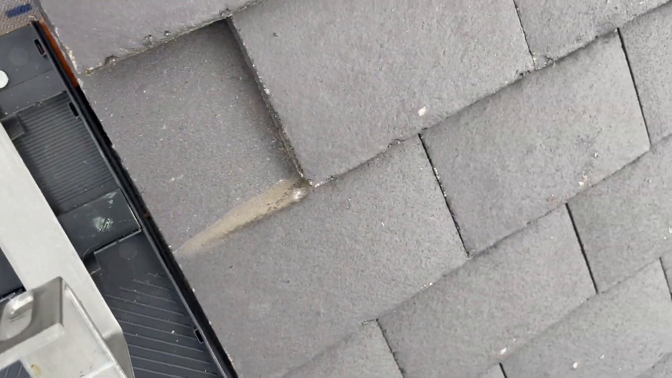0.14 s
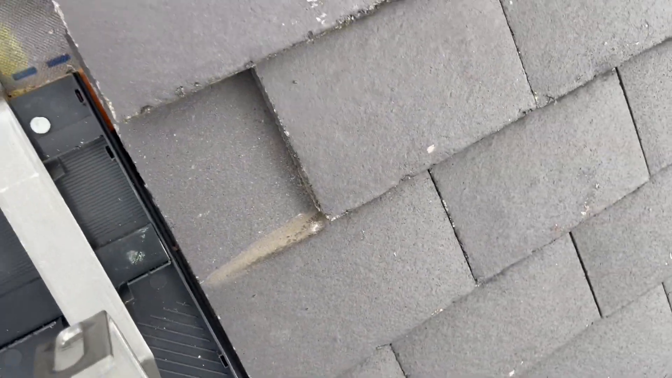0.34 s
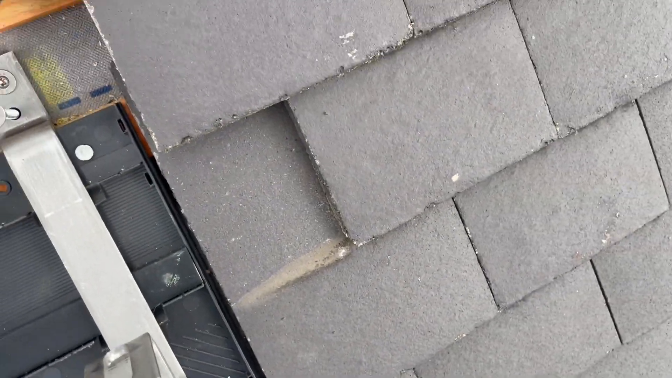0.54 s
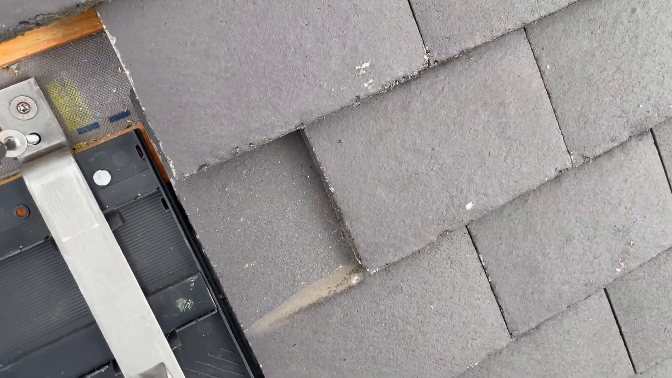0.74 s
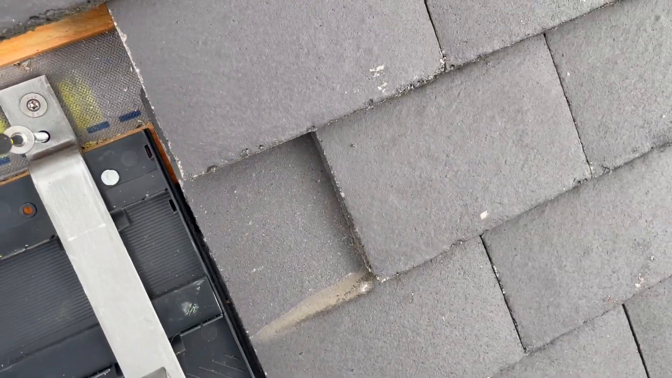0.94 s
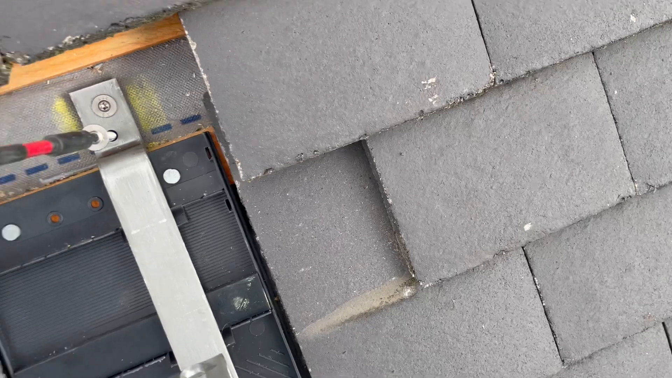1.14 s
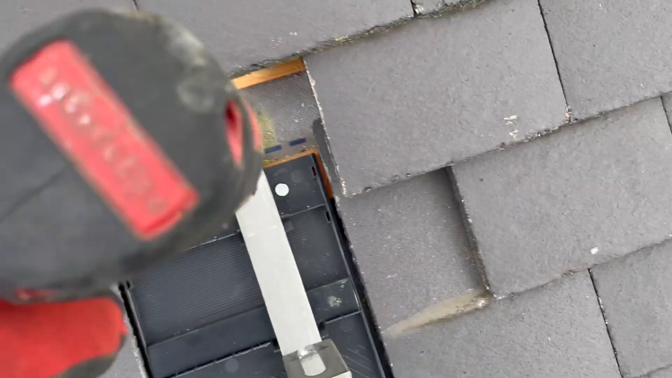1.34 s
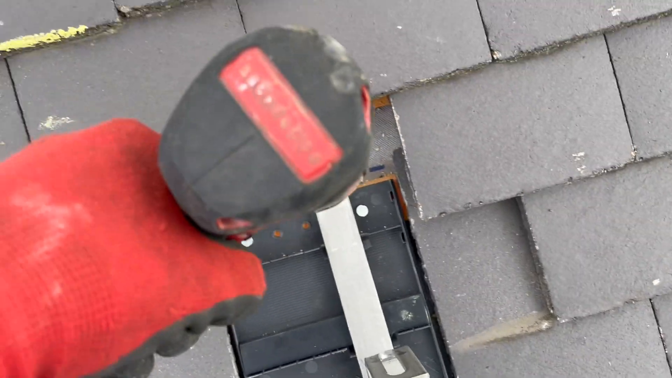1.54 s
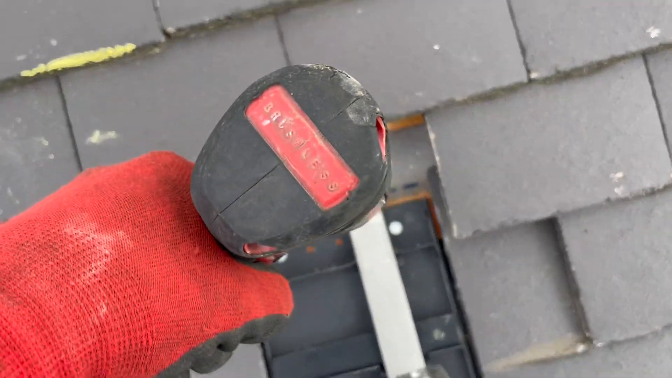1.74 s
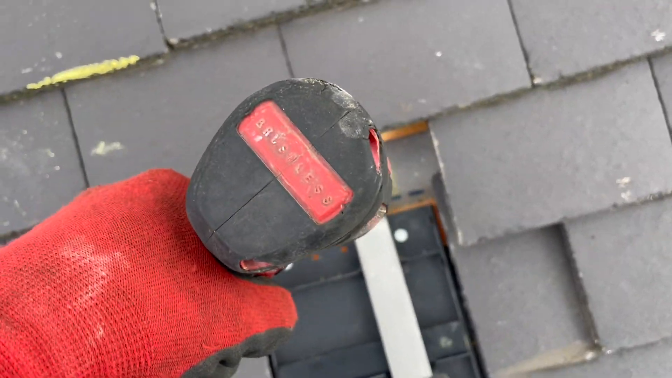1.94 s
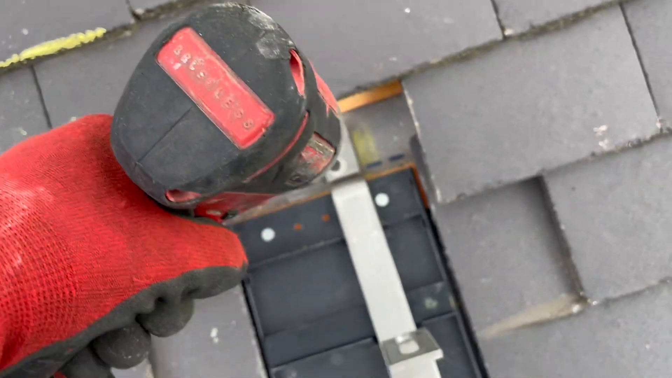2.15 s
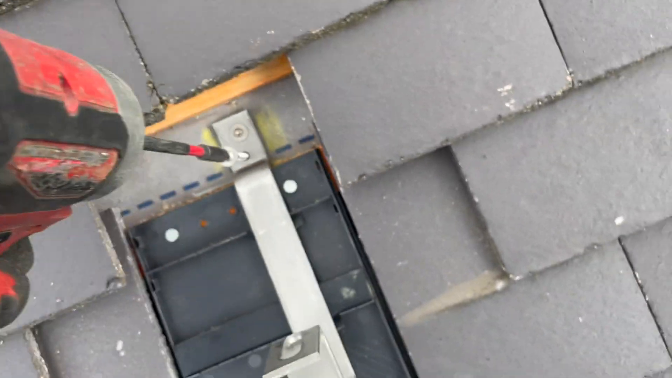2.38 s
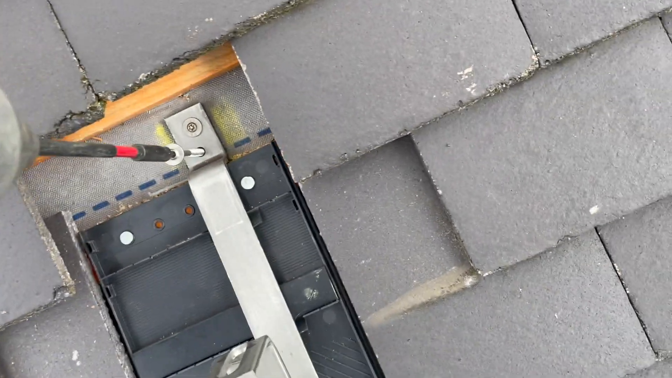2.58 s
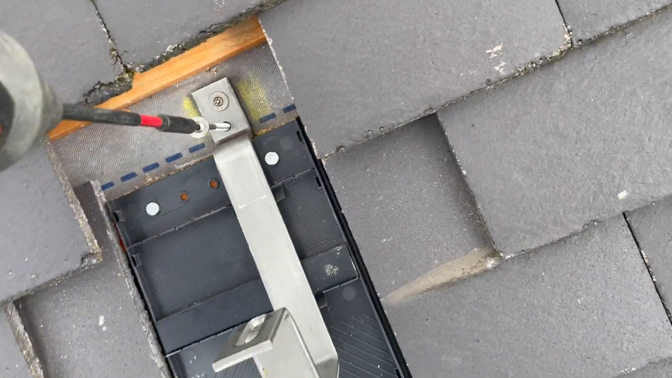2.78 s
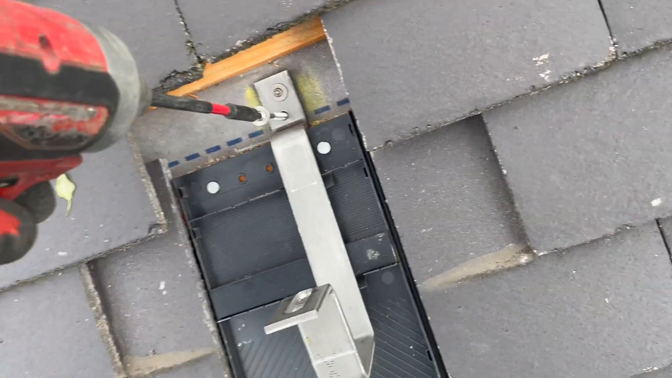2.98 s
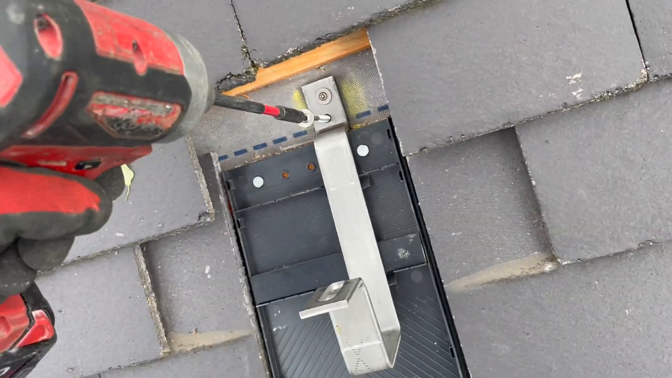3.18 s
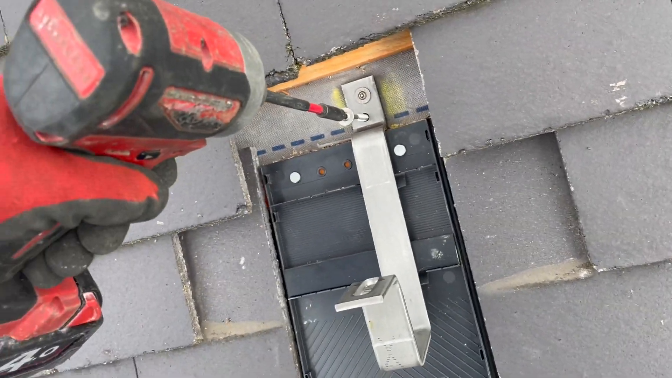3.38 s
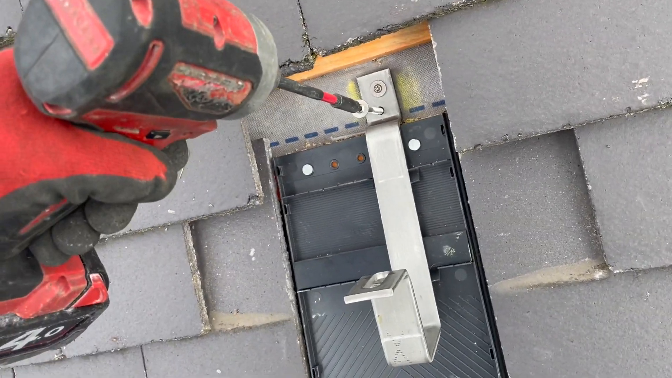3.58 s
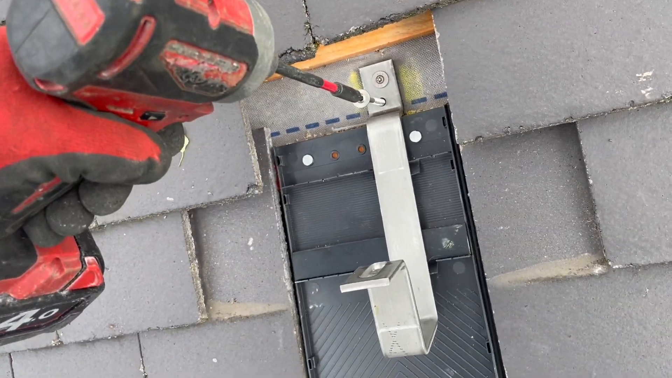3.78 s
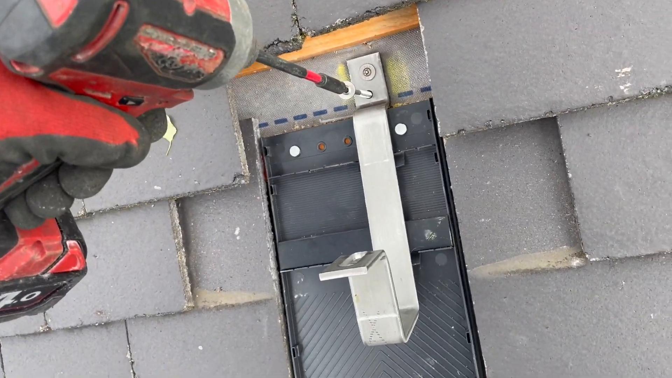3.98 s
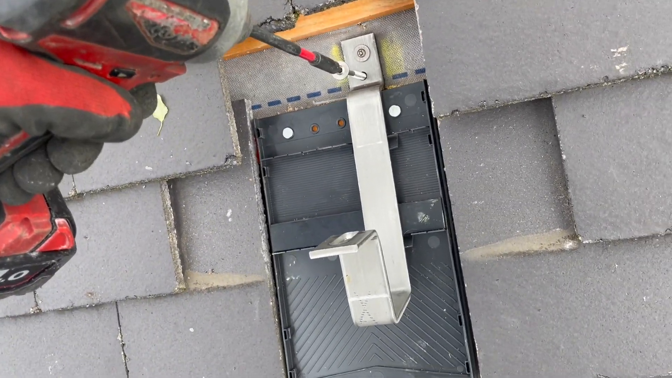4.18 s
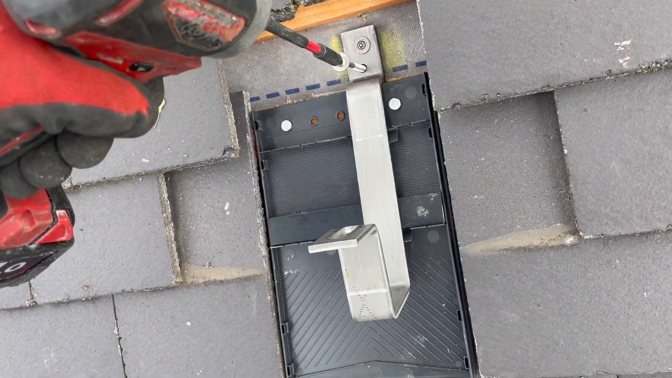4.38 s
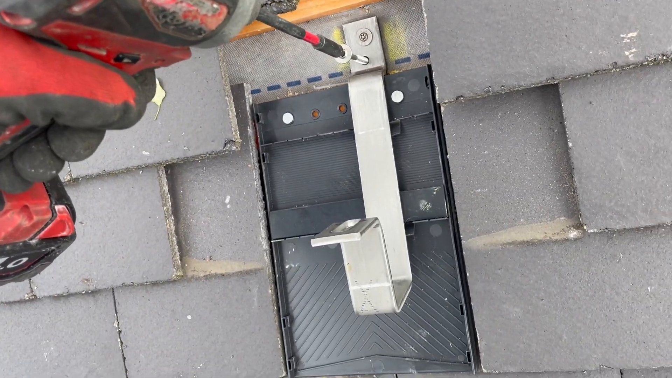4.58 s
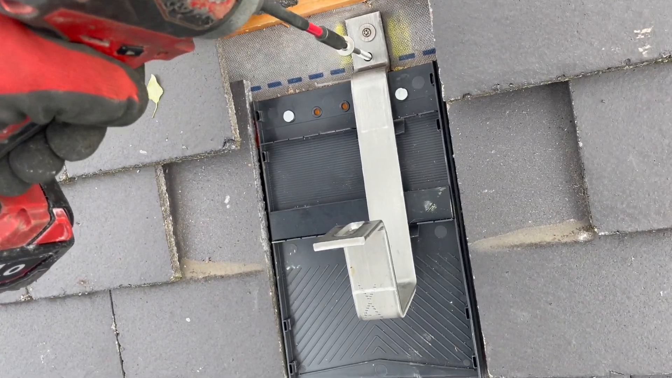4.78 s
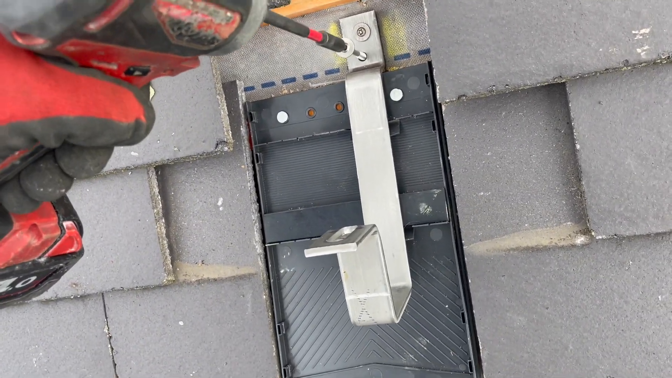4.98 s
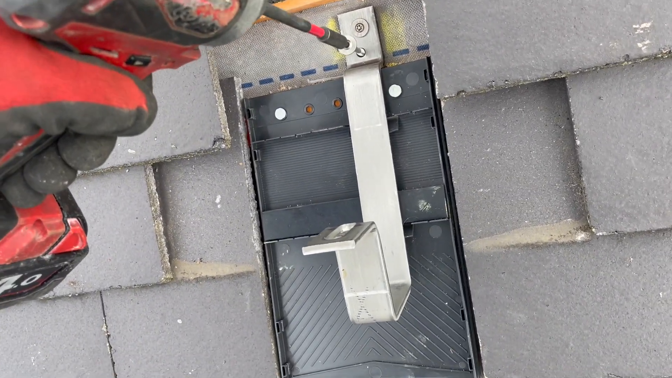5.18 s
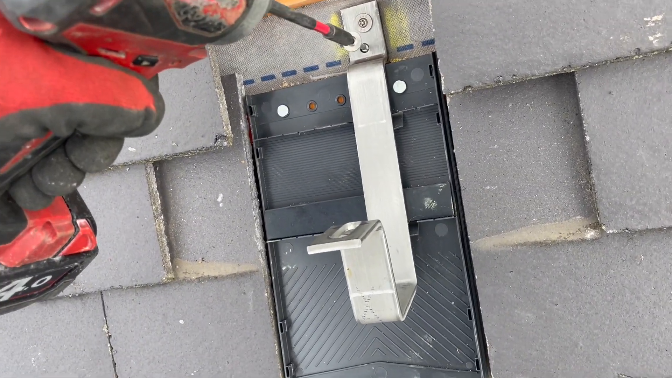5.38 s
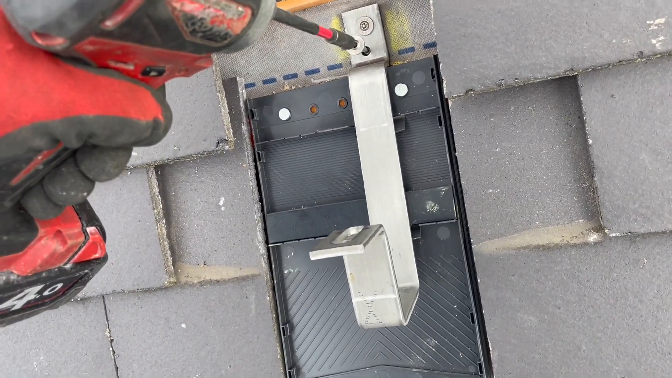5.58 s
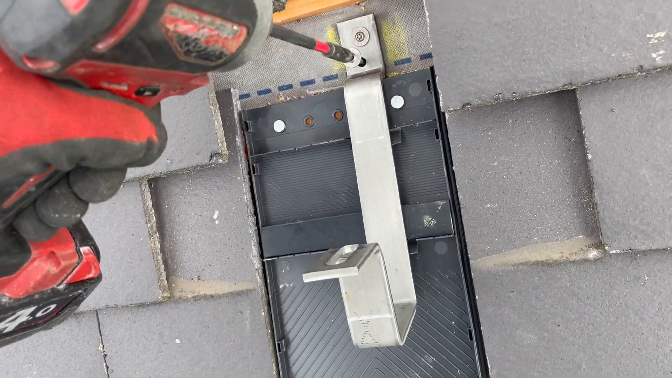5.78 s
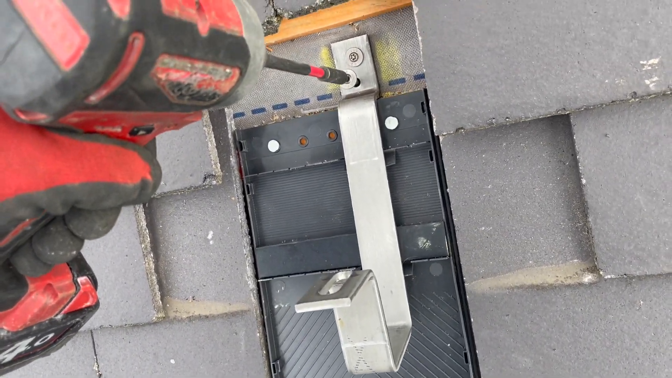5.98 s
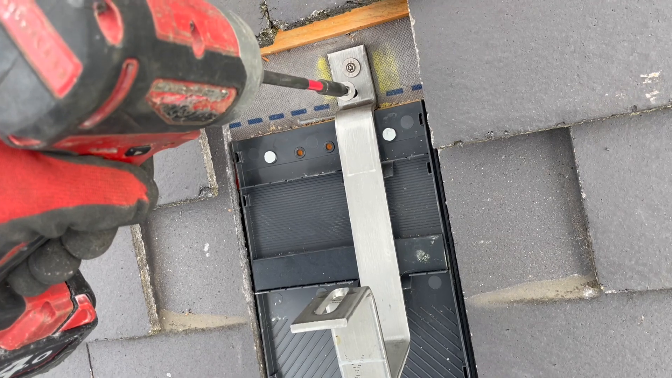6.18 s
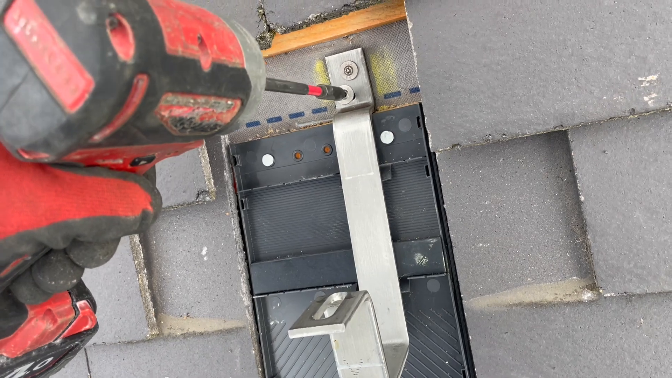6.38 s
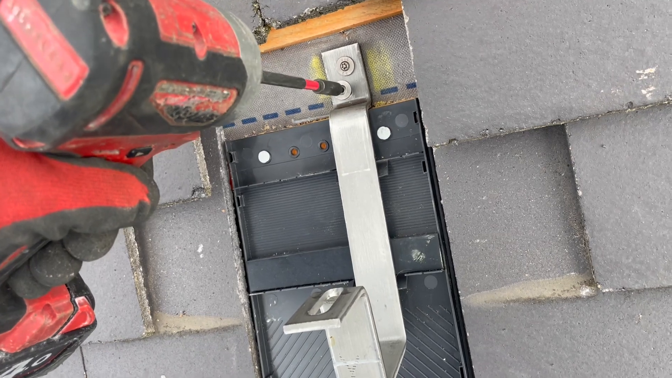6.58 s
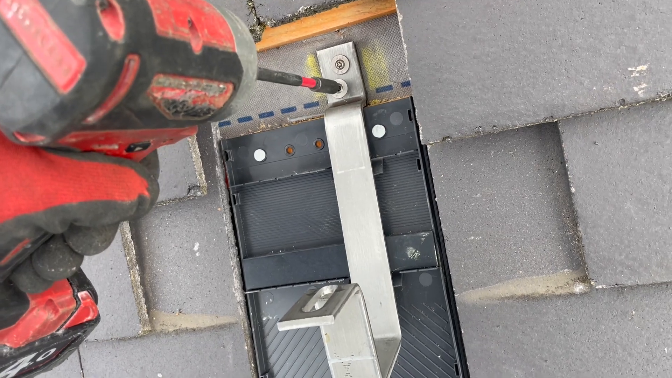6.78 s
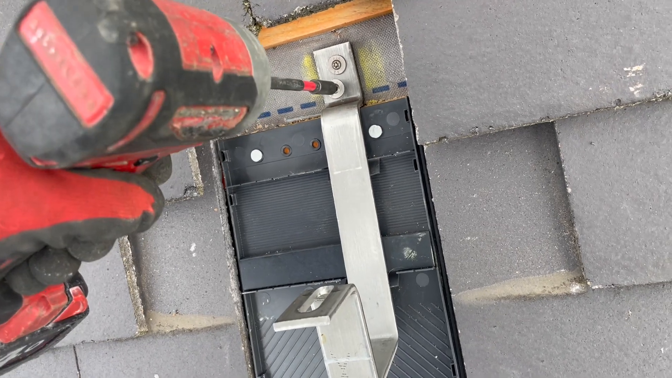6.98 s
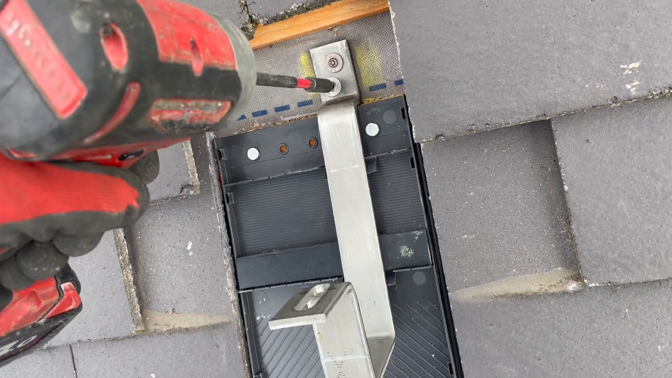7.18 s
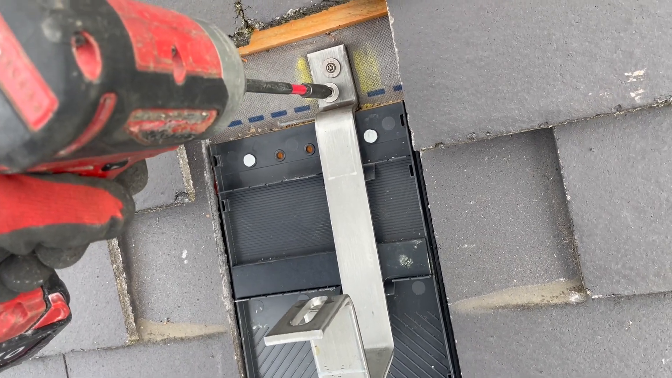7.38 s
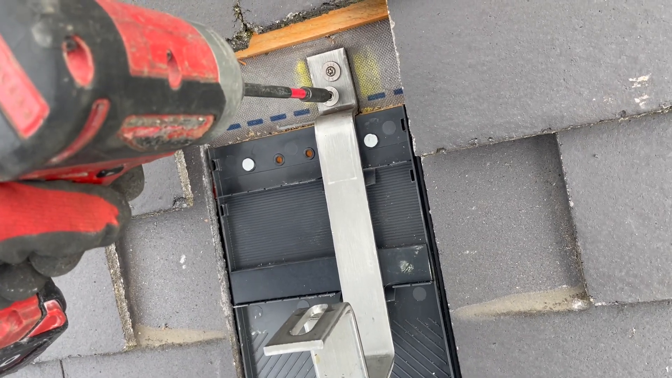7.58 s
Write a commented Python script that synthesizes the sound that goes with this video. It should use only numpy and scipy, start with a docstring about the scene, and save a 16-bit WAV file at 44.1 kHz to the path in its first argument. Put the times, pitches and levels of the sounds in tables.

```python
"""An impact driver sinks a screw through a steel hook into a rafter, close to a two-port microphone on a slate roof.
The tool knocks into place while a small bird whistles far off over a quiet hush. The motor spins up with a whine
of gliding sines and brief squeaks, then the hammer rattles towards sixty blows a second before the gears run down.
Blows are bursts of coloured noise and impulses ringing the casing and timber; knocks ring the hook's modes.
Thumps, a rumble of air and a rubbing grip, all shaped noise, betray the microphone being handled."""
import sys
import numpy as np
from scipy import signal
from scipy.fft import rfft, irfft, next_fast_len
from scipy.io import wavfile
from scipy.ndimage import map_coordinates

SR = 44100
rng = np.random.default_rng(int(sys.argv[2]) if len(sys.argv) > 2 else 0)


def write(x):
    x = np.atleast_2d(x).T
    wavfile.write(sys.argv[1], SR, np.round(np.clip(x, -1, 1) * 32767).astype(np.int16))


N = 336924
TIME = np.arange(N) / SR  # s

# Handling
# the microphone is jostled: [t/s, peak level/dB, colour corner f/Hz]
THUMP_EVENTS = [(.005, -25.5, 118), (0.039, -24, 85), (.51, -35, 198), (0.559, -32, 199),
                (0.849, -30.5, 118), (1.29, -30, 154), (2.175, -26.5, 199), (2.361, -26, 119),
                (2.39, -19, 169), (2.444, -25, 155), (2.597, -28, 178), (3.838, -35, 88), (4.55, -29, 160),
                (4.615, -25.5, 155), (4.868, -18, 340), (6.101, -27, 220), (6.642, -19, 91.3),
                (6.968, -33.5, 252), (7.042, -29.5, 398.3), (7.105, -25.5, 291), (7.125, -26, 200),
                (7.263, -25, 322), (7.3, -30, 397.3), (7.34, -24.5, 354), (7.385, -31, 380),
                (7.495, -31, 379)]
# air moving over the microphone: [t/s, relative level/dB]
AIR_LEVEL = [(0, -33.5), (.06, -30), (.28, -51), (.37, -46.5), (1.3, -41), (1.5, -50), (2.08, -46),
             (2.4, -33.5), (2.7, -51), (3.1, -70.5), (3.7, -61), (4.5, -41), (4.9, -43.5), (6.45, -41.5),
             (6.66, -29.5), (6.85, -37), (7.3, -32), (7.64, -44)]
# colour of that air: [f/Hz, relative level/dB]
RUMBLE_SPECTRUM = [(20, -40.5), (55, 6), (100, 0), (180, -8.5), (300, -15.5), (500, -31), (1000, -45.5),
                   (3000, -110)]
# the hand shifts its grip on the microphone as the tool stops and after: [t/s, level before unevenness/dB]
GRIP_LEVEL = [(6.78, -80), (6.83, -39), (7.02, -64), (7.13, -44), (7.2, -69), (7.355, -41.5), (7.41, -43),
              (7.46, -68), (7.62, -48.5)]
# colour of the rubbing: [f/Hz, relative level/dB]
RUB_SPECTRUM = [(60, -17.5), (150, -4), (250, 2), (430, -6), (560, -19), (1300, -49.5), (3000, -100)]

# Background and bird
# colour of the outdoor hush: [f/Hz, relative level/dB]
OUTDOOR_SPECTRUM = [(50, -4), (110, -8), (200, -3.5), (360, -4), (550, -7), (1000, -9), (1900, -17),
                    (2500, -13.5), (3200, -18.5), (5200, -22.5), (6500, -29.5), (7800, -33.5), (14000, -52)]
# whistles and trills: [t/s, length/s, start f/Hz, middle f/Hz, end f/Hz, relative level/dB, flutter/share of pitch]
BIRD_SONG = [(1.96, 0.083, 5930, 5750, 5660, -69, 0.0068), (2.07, 0.045, 5220, 4620, 4350, -60.5, 0.02),
             (2.136, 0.052, 4650, 4320, 4340, -59, 0.0044), (2.251, 0.039, 5020, 4860, 4800, -63, 0.013),
             (2.335, 0.039, 5870, 5720, 5660, -62.5, 0.0073), (2.452, 0.014, 4620, 4300, 3800, -52, 0.027),
             (2.592, 0.025, 5300, 5330, 5450, -56.5, 0.006), (2.64, 0.036, 5620, 5500, 5450, -61, 0.0058),
             (2.7, .025, 5650, 5650, 5770, -62.5, .006), (2.75, 0.023, 5700, 5720, 5750, -64.5, .006),
             (2.835, 0.049, 4200, 4750, 5300, -65, 0.043), (2.888, 0.019, 3870, 4600, 5300, -57, .01),
             (2.9, 0.076, 5380, 5150, 5130, -58.5, 0.0077), (2.989, 0.076, 6230, 5970, 5730, -66, 0.051),
             (3.16, 0.035, 3900, 3450, 3240, -58, 0.022), (3.19, 0.021, 4580, 4430, 4350, -60, 0.014),
             (3.258, 0.0305, 4600, 4530, 4460, -58.5, .02), (3.385, 0.14, 5280, 4690, 5510, -53.5, 0.0082),
             (3.654, 0.052, 5100, 4150, 2900, -55, 0.008), (4.05, 0.062, 4150, 4100, 4090, -62, 0.035),
             (4.168, 0.017, 4340, 3700, 3400, -58, 0.017), (4.208, 0.12, 3750, 4470, 4750, -57.5, 0.0063),
             (4.392, 0.031, 6130, 6200, 6300, -62, .008), (4.511, 0.12, 5840, 5370, 5020, -54.5, 0.0078)]
# the hush sinks steadily while the tool runs and stays low afterwards (dB); it sways slowly (dB)
HUSH_DB, HUSH_DIP_DB, HUSH_SWAY_DB = -58, 19.5, 1.3

# Knocks on the hook
# tool and screw knock on the hook: [t/s, relative level/dB, body level over that/dB]
KNOCK_EVENTS = [(0.312, -44, -3), (0.402, -26, -5.5), (0.413, -29, -8), (0.422, -35, -1),
                (0.754, -22.5, -11.5), (0.769, -22, -16), (0.776, -29, -11), (0.936, -40.5, 2),
                (1.232, -36, 4), (1.566, -42.5, -2.5), (1.601, -29, -6), (1.6098, 0, -2.5),
                (1.619, -17, -0.5), (1.651, -33, -10), (1.884, -55.5, 20), (3.8142, -43.5, 4),
                (4.872, -14, 2)]
# modes of the hook on its rafter: [f/Hz, relative level/dB, t60/s]
HOOK_MODES = [(106, -1, 0.028), (173, -2.5, 0.075), (304, -5.5, 0.042), (380, -1, 0.059), (710, -6, 0.055),
              (970, -4.5, 0.029), (1177, 9, 0.019), (1435, -3, 0.036), (1690, -10, 0.021),
              (1930, -10.5, 0.034), (2080, -10, 0.079), (2150, -1.5, 0.045), (2440, -14.5, 0.089),
              (3100, -20.5, 0.035), (3430, -20, .045), (3760, -18.5, .05), (5200, -1, 0.006)]
# colour of the contact itself: [f/Hz, relative level/dB]
TICK_SPECTRUM = [(200, 5), (560, 3.5), (1200, 4), (2200, 4.5), (3000, 0.5), (5400, -1), (7500, -17),
                 (10000, -20.5), (16000, -29.5)]
# light steel parts touch: [t/s, level/dB]
CLINK_EVENTS = [(0.754, -38), (0.773, -36.5)]
# colour of the touching steel: [f/Hz, relative level/dB]
CLINK_SPECTRUM = [(2000, -17), (5000, 8), (10000, -4), (16000, -9)]
# a gentle knock is a softer contact and rings the high modes less:
# corner at a knock level of 0 dB (Hz), fall in level that halves it (dB)
CONTACT_HZ, SOFTER_DB_PER_OCTAVE = 14000, 10.5

# Trigger, motor and gears
# the motor starts, the screw bites, the trigger is let go, the shaft stands still (s)
START_S, BITE_S, RELEASE_S, STILL_S = 4.72, 4.88, 6.835, 6.921
# gear lines: [multiple of the whine's f, relative level at top speed/dB, loss below it/dB per octave]
WHINE_LINES = [(.385, -15, 0), (0.501, -12, 10), (0.764, 2, 70), (1, 2.5, 8), (1.584, 2.5, 24),
               (1.87, -6, 20), (2.03, 1, 25), (2.16, -4, 5)]
# the whine climbs steadily to top speed, louder as it climbs
WHINE_START_HZ, WHINE_CLIMB_HZ_PER_S, WHINE_TOP_HZ = 1120, 17000, 2644
# it fades when the screw starts to drag
WHINE_DB, WHINE_DB_PER_OCTAVE, DRAG_S, DRAG_DB_PER_S = -24.5, 8, 4.845, 259
# rush of the unloaded motor and gears: [f/Hz, relative level/dB]
FREE_SPIN_SPECTRUM = [(20, -40), (130, -18), (400, -4), (700, -12.5), (950, 2.5), (1500, -5), (2000, -2.5),
                      (2500, 4), (3000, 1), (4500, 5), (5800, 4.5), (7800, 1.5), (10500, -9),
                      (16000, -21.5)]
# grinding of the loaded gears: [f/Hz, relative level/dB]
GEAR_SPECTRUM = [(20, -48), (60, -9.5), (150, -3.5), (350, -3.5), (620, -9.5), (1150, 1), (1650, -5),
                 (2450, 3), (2950, -3), (5500, -0.5), (7800, -13.5), (10500, -16.5), (16000, -21.5)]
# the drive train jolts as the load changes: [t/s, width/s, grinding level before unevenness/dB]
JOLT_EVENTS = [(4.707, 0.0039, -20), (4.88, 0.0075, -15.5), (6.827, 0.01, -21.5)]
# grinding in each state of the motor, before its unevenness (dB)
GRIND_FREE_DB, GRIND_LOOSE_DB, GRIND_SEATED_DB, GRIND_COAST_DB = -19, -25.5, -28, -34
# fall after release, and further fall once the shaft stands still
COAST_DB_PER_S, BRAKE_DB_PER_S = 155, 1798
ENGAGE_S = .006  # time for the grinding to change from one state to the next
# brief gliding squeaks as the motor spins up, before the screw bites:
# [t/s, length/s, start f/Hz, middle f/Hz, end f/Hz, level/dB, flutter/share of pitch]
SQUEAK_NOTES = [(4.722, .025, 395, 543, 800, -34, .01), (4.746, 0.0085, 910, 945, 970, -19, 0.0046),
                (4.76, 0.014, 2630, 2550, 2560, -19.5, 0.0042)]

# Hammer
FIRST_BLOW_S, LAST_BLOW_S = 4.8958, 6.785
# the sudden load drags the hammer below its working rate (blows per second); it recovers, then creeps up
BLOW_HZ, SAG_HZ, RECOVER_S, CREEP_HZ_PER_S = 59.9855, 11.7087, .3, 1.514
# as the thread takes hold, more of each blow goes into the timber: time constant (s), relative levels (dB)
SEAT_S, TIMBER_LOOSE_DB, TIMBER_SEATED_DB = 0.65, -30, -24.5
# the hammer bounces back later and harder while the screw is loose: delay (s), level against the blow (dB)
REBOUND_LOOSE_S, REBOUND_SEATED_S = .0053, .0031
REBOUND_LOOSE_DB, REBOUND_SEATED_DB = -4, -10
SNAP_GROWS = .6  # extra dB of snap for each dB of force
# level of an ordinary crack as the screw works through the grain: [t/s, relative level/dB]
CRACK_LEVELS = [(4.9, -22.5), (5.3, -22.5), (5.6, -25.5), (5.9, -25), (6.07, -22.5), (6.3, -23), (6.8, -24)]
# colour of the crack: [f/Hz, relative level/dB]
CRACK_SPECTRUM = [(700, -29), (1500, -6.5), (2400, -8.5), (3000, -3), (4300, 0.5), (6000, 2.5), (7800, -2),
                  (10000, -3.5), (12500, -11), (15500, -4.5)]
# blows that land squarely and stand out of the rattle: [t/s, level over an ordinary blow/dB]
SQUARE_BLOWS = [(4.896, 3), (5.034, 2.2), (5.145, 2.8), (5.181, 3.2), (5.216, 3.2), (5.321, 4),
                (5.373, 3.3), (5.424, 4.5), (5.458, 4.5), (5.509, 4), (5.559, 4.5), (5.609, 4), (5.659, 3),
                (5.692, 3), (5.742, 3), (5.84, 3), (5.873, 2.7), (5.955, 3.7), (6.037, 4), (6.297, 2.2),
                (6.537, 3.5), (6.634, 2.5), (6.713, 3.2), (6.777, 3.2)]
# single catches of the hammer at start, bite and release: [t/s, relative level/dB]
HAMMER_CATCHES = [(4.7037, -7.5), (4.716, -9), (4.8797, -14), (6.798, -5), (6.821, -11.5), (6.831, -20.5)]
# casing of tool and bit: [f/Hz, width/Hz, relative level with screw standing out/dB, with screw sunk/dB]
CASING_MODES = [(1808, 88, -14, -1), (2093, 49, 0, -6), (2430, 78, -4.5, 2), (2590, 90, 0, 1.5),
                (3130, 190, -22.5, -3.5), (4050, 550, -7.5, -11)]
# rafter and slates: [f/Hz, width/Hz, relative level with screw standing out/dB, with screw sunk/dB]
TIMBER_MODES = [(121.3, 45, -2, -0.5), (177, 29.7, 9.5, 7.5), (252.6, 35, -9, -2), (330, 50, 2.5, -16.5),
                (413, 60, 3, -8), (484, 35, 0.5, -3), (712, 21, -8.5, 2.5), (790, 31, -0.5, 1.5),
                (910, 70, -1, -7), (1094, 79, 0, 3), (1334, 69, 2.5, 2.5), (1390, 28, -7.5, 10.5)]
# the coasting gears tick ever more slowly: first tick (s), first gap (s), each gap over the last
TICK_START_S, TICK_GAP_S, TICK_SLOWING = 6.8563, .0094, 1.035
COAST_TICK_DB, COAST_TICK_LOSS_DB = -18.5, 1.2  # relative level of the first tick, loss per tick

# Place and microphone
# phase between the two ports: [f/Hz, lead of the left/rad]
PORT_PHASE = [(1800, 0), (2500, 1.1), (4300, 1.1), (5100, .2), (6200, 1.6), (7800, 3.14), (11100, 6.28),
              (14300, 9.4), (16000, 10.5)]
FLICKER_RAD = .8  # the stereo image of the close sounds flickers
# scatter from the slates and the tool: [f/Hz, t60/s]
ROOF_DECAY = [(150, 0.2), (1000, 0.11), (2500, 0.032), (14000, 0.0077)]
# strength of that scatter: [f/Hz, level/dB]
SCATTER_LEVEL = [(150, -21), (1500, -17), (2400, -11), (5000, -14), (8000, -16), (14000, -15)]
# far walls answer: [f/Hz, t60/s]
STREET_DECAY = [(200, .7), (2000, 1), (5000, .45), (14000, .15)]
TOP_HZ = 15900  # band limit of the recorder


def amp(db):
    """Decibels to gain."""
    return 10 ** (np.asarray(db) / 20)


def unit(x):
    """Scaled to rms 1."""
    return x / np.sqrt(np.mean(x ** 2) + 1e-20)


def along(points, hz):
    """Curve of (Hz, value) points read on a log frequency axis."""
    f, value = np.transpose(points)
    return np.interp(np.log(hz + 1), np.log(f + 1), value)


def curve(rows):
    """One value per sample, drawn straight between (s, value) points."""
    s, value = np.transpose(rows)
    return np.interp(TIME, s, value)


def wobble(rate):
    """A smooth random curve, rate knots a second."""
    knots = rng.standard_normal(int(N * rate / SR) + 4)
    return map_coordinates(knots, [TIME * rate])


def filtered(x, response):
    """x times a complex response of frequency."""
    size = x.shape[-1]
    m = next_fast_len(size + 16384)  # room for the filter to ring out
    spectrum = rfft(x, m) * response(np.fft.rfftfreq(m, 1 / SR))
    return irfft(spectrum, m)[..., :size]


def noise(spectrum):
    """Coloured noise of rms 1."""
    return unit(filtered(rng.standard_normal(N), lambda hz: amp(along(spectrum, hz))))


def add(track, s, sound):
    """Mix a sound into a track at time s."""
    part = track[max(round(s * SR), 0):][:len(sound)]
    part += sound[:len(part)]


def spikes(times, sizes):
    """One impulse for each contact."""
    samples = np.round(np.asarray(times) * SR).astype(int)
    return np.bincount(samples, sizes, N)[:N]


def bursts(contacts, spectrum, t60, rise):
    """Each contact sets off a dense cloud of quickly dying overtones: noise under a summed power envelope."""
    t = np.arange(SR // 8) / SR
    shape = amp(-60 * t / t60) * (1 - np.exp(-t / rise))
    power = signal.fftconvolve(contacts ** 2, (shape / shape.max()) ** 2)[:N]
    return np.sqrt(np.abs(power)) * noise(spectrum)


def glides(notes):
    """Short tones that slide through three pitches and flutter on the way."""
    out, quiver = np.zeros(N), wobble(220)
    for s, length, start_hz, middle_hz, end_hz, db, flutter in notes:
        u = np.linspace(0, 1, int(length * SR))
        hz = np.polyval(np.polyfit([0, .5, 1], [start_hz, middle_hz, end_hz], 2), u)
        hz = hz * (1 + flutter * quiver[int(s * SR):][:len(u)])
        envelope = np.abs(np.sin(np.pi * u)) ** 0.16
        add(out, s, amp(db) * envelope * np.sin(2 * np.pi * np.cumsum(hz) / SR))
    return out


def ring(x, modes):
    """A body rings with its resonances, of alternating sign; the energy of a blow is kept."""
    def response(f):
        return sum((-1) ** k * amp(db) * 1j * f * width / (centre * centre - f * f + 1j * f * width)
                   for k, (centre, width, db) in enumerate(modes))
    energy = np.mean(np.abs(response(np.linspace(0, SR / 2, 8192))) ** 2)
    return filtered(x, response) / np.sqrt(energy)


def sinking(x, modes):
    """The balance of a body's resonances shifts as the screw sinks."""
    depth = np.interp(TIME, [FIRST_BLOW_S, LAST_BLOW_S], [0, 1])
    standing = [(hz, width, db) for hz, width, db, _ in modes]
    sunk = [(hz, width, db) for hz, width, _, db in modes]
    return ring(x * (1 - depth), standing) + ring(x * depth, sunk)


def seated(s):
    """How firmly the thread holds in the timber, from 0 at the first blow towards 1."""
    return 1 - np.exp(-np.maximum(s - FIRST_BLOW_S, 0) / SEAT_S)


def ports(x, flicker):
    """The two ports hear a sound at different phases; their difference flickers by so many radians."""
    mid = filtered(x, lambda hz: np.cos(along(PORT_PHASE, hz) / 2))
    side = filtered(x, lambda hz: 1j * np.sin(along(PORT_PHASE, hz) / 2))
    analytic = signal.hilbert(side, next_fast_len(N))[:N]
    side = np.real(analytic * np.exp(1j * flicker * wobble(400)))
    return np.array([mid + side, mid - side])


def echoes(x, decay):
    """A diffuse stereo tail in which each frequency dies at its own speed."""
    hz, t, z = signal.stft(rng.standard_normal((2, SR // 2)), SR, nperseg=256)
    fading = amp(-60 * t / along(decay, hz)[:, None])
    tail = signal.istft(z * fading, SR, nperseg=256)[1]
    delayed = np.pad(x, (90, 0))[None]  # about 2 ms late
    return signal.fftconvolve(delayed, tail / np.linalg.norm(tail[0]), axes=1)[:, :N]


def handling(t60=0.096, air_gain_db=-4, side_db=-15):
    """Dull thumps of lowpassed noise, the same at both ports, and an uneven rumble of air."""
    thumps, t = np.zeros(N), np.arange(SR // 5) / SR
    for s, db, corner_hz in THUMP_EVENTS:
        def dull(f):
            highpass = (1j * f / (55 + 1j * f)) ** 3
            return highpass / (1 + 1.3j * f / corner_hz - (f / corner_hz) ** 2) ** 2
        push = rng.standard_normal(len(t)) * amp(-60 * t / t60) * (1 - np.exp(-t / 0.0036))
        thump = filtered(push, dull)
        add(thumps, s, amp(db) * thump / np.abs(thump).max())
    eddies_db = 3 * wobble(25)
    air_gain = amp(curve(AIR_LEVEL) + air_gain_db + eddies_db)
    mid, side = noise(RUMBLE_SPECTRUM), amp(side_db) * noise(RUMBLE_SPECTRUM)
    return thumps + air_gain * np.array([mid + side, mid - side])


def outdoors(side_db=-5.0):
    """A distant hush of coloured noise, a little different at each port, that sinks as the tool runs."""
    run = np.clip((TIME - START_S) / (STILL_S - START_S), 0, 1)
    hush_db = HUSH_DB - HUSH_DIP_DB * run + HUSH_SWAY_DB * wobble(2.0)
    side = amp(side_db) * noise(OUTDOOR_SPECTRUM)
    return amp(hush_db) * (ports(noise(OUTDOOR_SPECTRUM), 0) + np.array([side, -side]))


def knocks(tick_db=-8.0, rattle_db=-20.5, chatter_db=3.5):
    """Each knock is a sharp tick, a short uneven rattle and the ring of the hook on its rafter."""
    out, t = np.zeros(N), np.arange(SR // 4) / SR
    for s, db, body_db in KNOCK_EVENTS:
        corner_hz = CONTACT_HZ * 2 ** (db / SOFTER_DB_PER_OCTAVE)
        body = np.zeros(len(t))
        for hz, level_db, t60 in HOOK_MODES:
            vary_db, phase = rng.standard_normal(2)  # no two knocks ring alike
            softness = 1 + (hz / corner_hz) ** 2
            body += amp(level_db + vary_db - 60 * t / t60) / softness * np.sin(2 * np.pi * hz * t + np.pi * phase)
        body = body * (1 - np.exp(-t / 0.002))
        add(out, s, amp(db + body_db) * body / np.abs(body).max())
    times, knock_db, _ = np.transpose(KNOCK_EVENTS)
    contacts = spikes(times, amp(knock_db))
    tick = amp(tick_db) * bursts(contacts, TICK_SPECTRUM, t60=0.007, rise=0.0004)
    rattle_gain = amp(rattle_db + chatter_db * wobble(450))
    rattle = rattle_gain * bursts(contacts, TICK_SPECTRUM, t60=0.072, rise=0.0011)
    return out + tick + rattle


def clinks():
    """Bright touches of steel on steel, as very short noise bursts."""
    times, db = np.transpose(CLINK_EVENTS)
    return bursts(spikes(times, amp(db)), CLINK_SPECTRUM, t60=0.022, rise=0.00035)


def bird(direct_db=-2, wet_db=1.2, waver_db=2.5):
    """Thin gliding whistles from a distant tree, with their echo."""
    song = glides(BIRD_SONG) * amp(waver_db * wobble(90))
    echo = echoes(song, [(1000, 0.93), (8000, 0.94)])  # (Hz, t60 s)
    return amp(direct_db) * (ports(song, 0) + amp(wet_db) * echo)


def blow_times():
    """One blow each time the hammer has gone another half turn."""
    t = np.arange(0, LAST_BLOW_S - FIRST_BLOW_S, 1 / SR)
    rate_hz = BLOW_HZ - SAG_HZ * np.exp(-t / RECOVER_S) + CREEP_HZ_PER_S * t
    beats = np.cumsum(rate_hz) / SR
    return FIRST_BLOW_S + np.interp(np.arange(int(beats[-1]) + 1), beats, t)


def coast_ticks(count=6):
    """Light contacts, slower and weaker as the shaft runs down."""
    k = np.arange(count)
    times = TICK_START_S + TICK_GAP_S * (TICK_SLOWING ** k - 1) / (TICK_SLOWING - 1)
    return spikes(times, amp(COAST_TICK_DB - COAST_TICK_LOSS_DB * k))


def hammer(snap_db=9.0, crack_gain_db=7.5, push_db=21.0, casing_db=2.5, catch_gain_db=-8.5):
    """The hammer strikes the anvil twice a turn and rebounds once after each blow."""
    times = blow_times()

    def vary(spread):
        return spread * rng.standard_normal(len(times))

    def settle(loose, firm):
        return loose + (firm - loose) * seated(times)

    times = times + vary(.00008)
    force_db = vary(.9)
    for s, db in SQUARE_BLOWS:
        force_db[np.argmin(np.abs(times - s))] = db
    size = amp(np.interp(times, *np.transpose(CRACK_LEVELS)) + force_db)
    push = amp(settle(TIMBER_LOOSE_DB, TIMBER_SEATED_DB) + vary(1.6))
    # the bit has play in the screw head, so the crack comes a little early or late
    contact_s = times + vary(0.00029)
    blows = spikes(contact_s, size * amp(crack_gain_db))
    catch_s, catch_db = np.transpose(HAMMER_CATCHES)
    catches = amp(catch_gain_db) * (spikes(catch_s, amp(catch_db)) + coast_ticks())
    rebound_s = times + settle(REBOUND_LOOSE_S, REBOUND_SEATED_S) + vary(0.00067)
    rebound_db = crack_gain_db + settle(REBOUND_LOOSE_DB, REBOUND_SEATED_DB) + vary(1.9)
    rebounds = spikes(rebound_s, size * amp(rebound_db))
    steel = bursts(blows + catches + rebounds, CRACK_SPECTRUM, t60=.014, rise=0.0009)
    # the squarer the hit of the lugs, the more it opens with a very short snap
    snap_size = size * amp(snap_db + SNAP_GROWS * force_db)
    snap = bursts(spikes(contact_s + .0003, snap_size), CRACK_SPECTRUM, t60=0.0048, rise=0.000069)
    # the lugs never meet twice alike, so every blow rings the casing differently
    shake_contacts = spikes(contact_s, push * amp(casing_db + force_db / 2))
    shake = bursts(shake_contacts, [(20, 0)], t60=0.013, rise=0.0003)  # white noise
    timber_push = spikes(times + 0.001197, push * amp(push_db))
    return steel + snap + sinking(shake, CASING_MODES) + sinking(timber_push, TIMBER_MODES)


def grinding():
    """Gears and screw thread grind: bright while spinning freely, darker under load, dying away after release."""
    def past(s):
        return np.clip((TIME - s) / ENGAGE_S + .5, 0, 1)

    free = amp(GRIND_FREE_DB) * (past(START_S) - past(BITE_S))
    driving_db = GRIND_LOOSE_DB + (GRIND_SEATED_DB - GRIND_LOOSE_DB) * seated(TIME)
    driving = amp(driving_db) * (past(BITE_S) - past(RELEASE_S))
    coast_db = GRIND_COAST_DB - COAST_DB_PER_S * np.maximum(TIME - RELEASE_S, 0)
    coast_db = coast_db - BRAKE_DB_PER_S * np.maximum(TIME - STILL_S, 0)
    coasting = amp(coast_db) * past(RELEASE_S)
    jolts = sum(amp(db) * np.exp(-((TIME - s) / width) ** 2) for s, width, db in JOLT_EVENTS)
    loaded = np.hypot(driving + coasting, jolts)
    return amp(2.9 * wobble(500)) * (free * noise(FREE_SPIN_SPECTRUM) + loaded * noise(GEAR_SPECTRUM))


def motor(rough=.008, flutter_db=3):
    """The gears whine as rough sine lines while the shaft spins freely, until the screw bites."""
    climb_hz = WHINE_CLIMB_HZ_PER_S * np.maximum(TIME - START_S, 0)
    whine_hz = np.minimum(WHINE_START_HZ + climb_hz, WHINE_TOP_HZ)
    octaves_below = np.log2(WHINE_TOP_HZ / whine_hz)
    drag_db = DRAG_DB_PER_S * np.maximum(TIME - DRAG_S, 0)
    whine_db = WHINE_DB - WHINE_DB_PER_OCTAVE * octaves_below - drag_db
    whine = 0
    for multiple, db, loss_db in WHINE_LINES:
        line_hz = multiple * whine_hz * (1 + rough * wobble(700))
        line_db = whine_db + db - loss_db * octaves_below + flutter_db * wobble(120)
        whine = whine + amp(line_db) * np.sin(2 * np.pi * np.cumsum(line_hz) / SR)
    return whine * (TIME > START_S) * (TIME < BITE_S)


def squeaks():
    """Brief gliding squeaks as the motor spins up, before the screw bites."""
    return glides(SQUEAK_NOTES)


def grip(uneven_db=2.0):
    """A dull, uneven rubbing of lowpassed noise that reaches both ports alike."""
    rub_gain = amp(curve(GRIP_LEVEL) + uneven_db * wobble(45))
    return rub_gain * noise(RUB_SPECTRUM) * (TIME > GRIP_LEVEL[0][0])


def scene(street_db=-45.0):
    """The near sounds reach the two ports at different phases; the slates scatter them and far walls answer faintly."""
    near = knocks() + clinks() + hammer() + grinding() + motor() + squeaks()
    scattered = filtered(echoes(near, ROOF_DECAY), lambda hz: amp(along(SCATTER_LEVEL, hz)))
    street = amp(street_db) * echoes(near, STREET_DECAY)
    return ports(near, FLICKER_RAD) + scattered + street + handling() + outdoors() + bird() + grip()


def record(dry):
    """The recorder rounds off the highest peaks and cuts steeply above its band limit."""
    rounded = dry / (1 + np.abs(dry / .95) ** 8) ** (1 / 8)
    return filtered(rounded, lambda hz: 1 / (1 + (hz / TOP_HZ) ** 200))


dry = scene()
out = record(dry)
write(out)
```